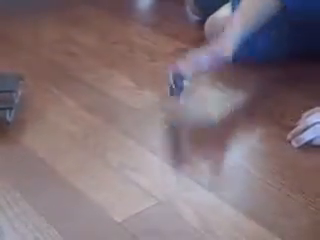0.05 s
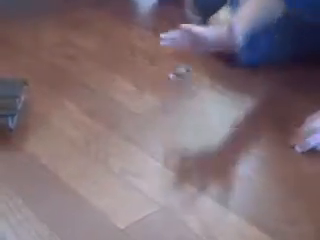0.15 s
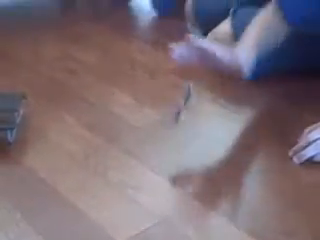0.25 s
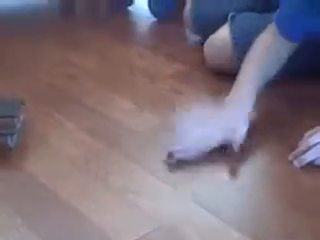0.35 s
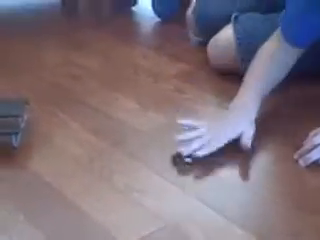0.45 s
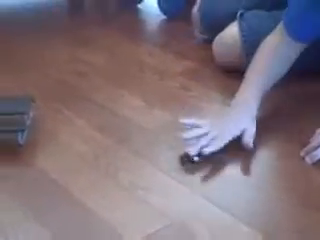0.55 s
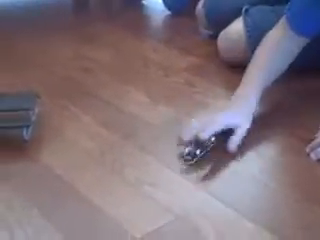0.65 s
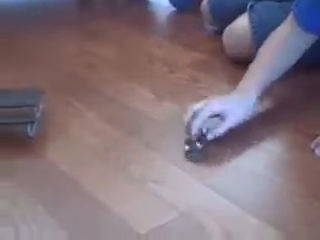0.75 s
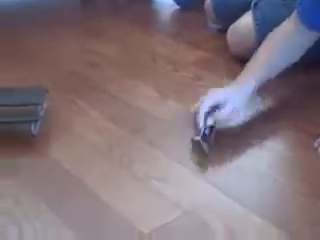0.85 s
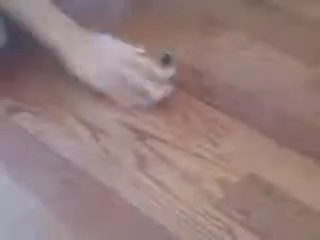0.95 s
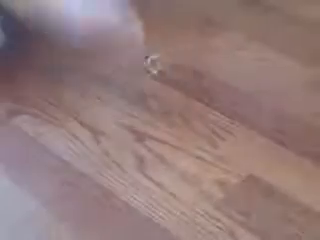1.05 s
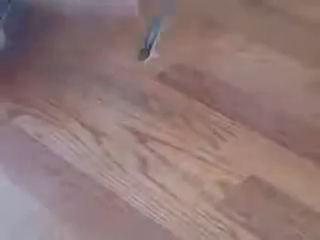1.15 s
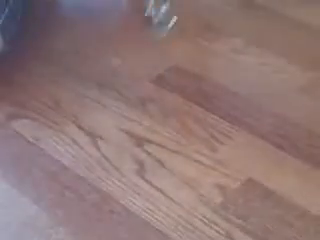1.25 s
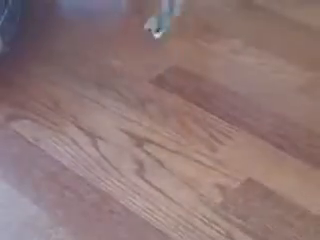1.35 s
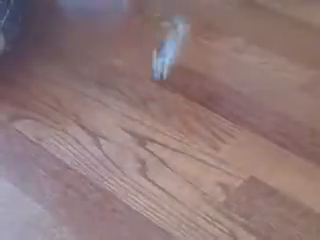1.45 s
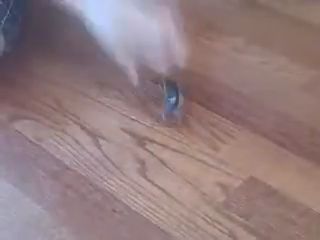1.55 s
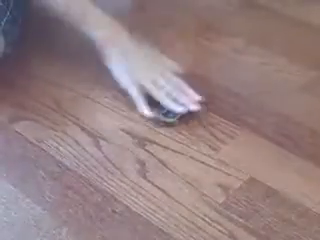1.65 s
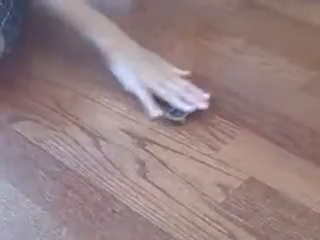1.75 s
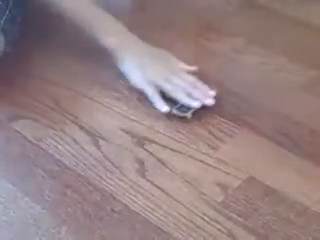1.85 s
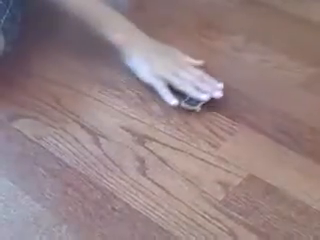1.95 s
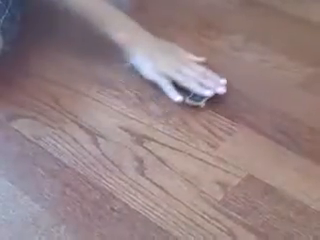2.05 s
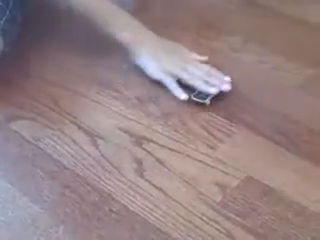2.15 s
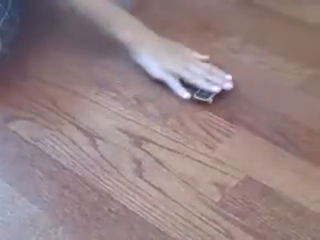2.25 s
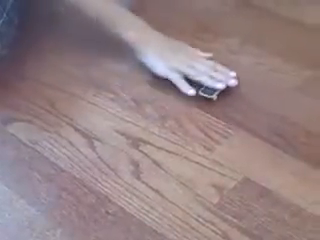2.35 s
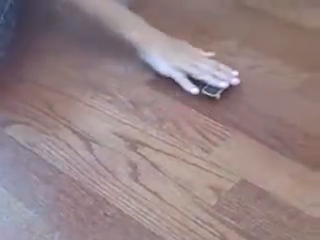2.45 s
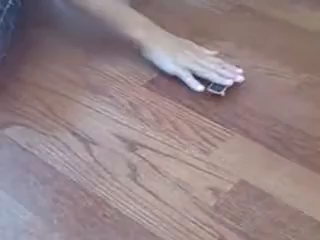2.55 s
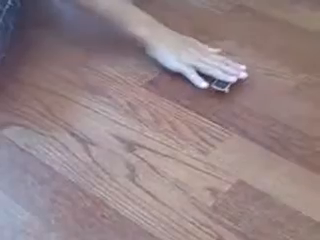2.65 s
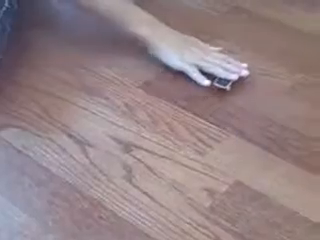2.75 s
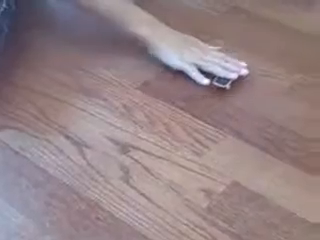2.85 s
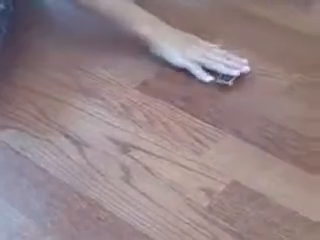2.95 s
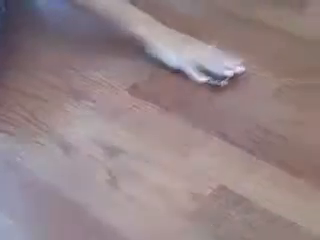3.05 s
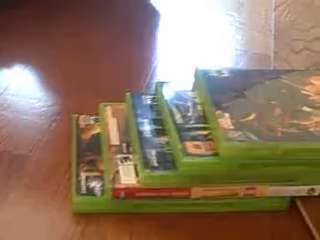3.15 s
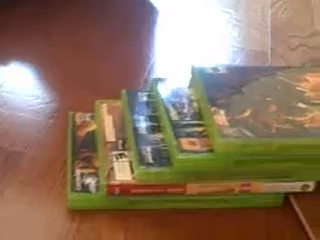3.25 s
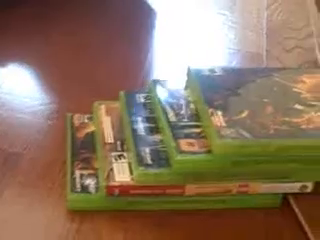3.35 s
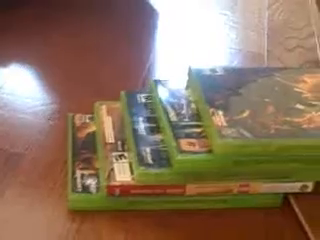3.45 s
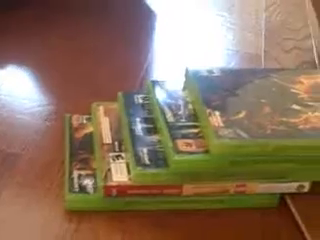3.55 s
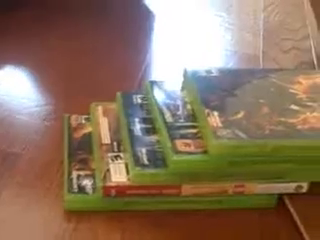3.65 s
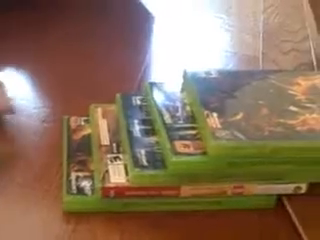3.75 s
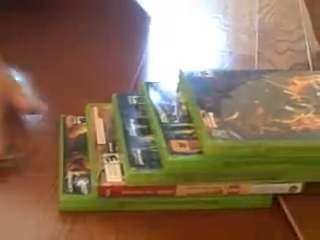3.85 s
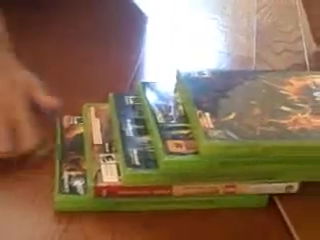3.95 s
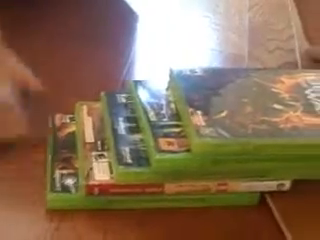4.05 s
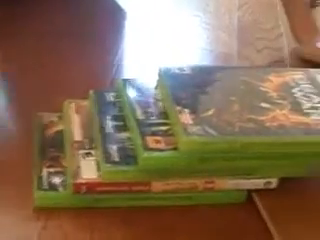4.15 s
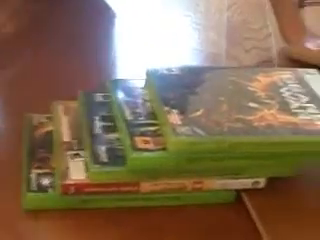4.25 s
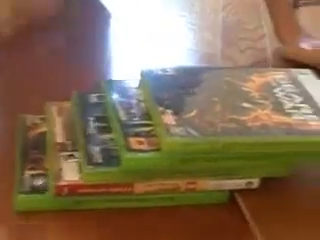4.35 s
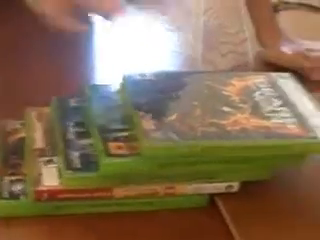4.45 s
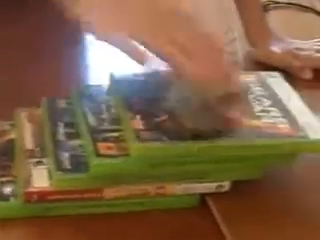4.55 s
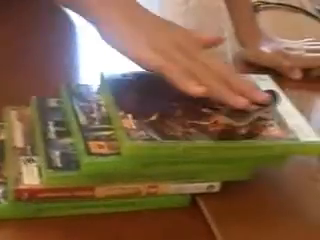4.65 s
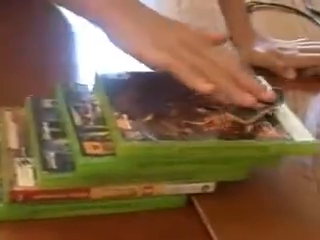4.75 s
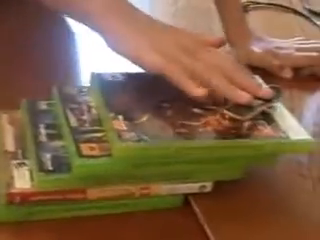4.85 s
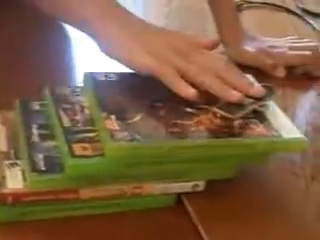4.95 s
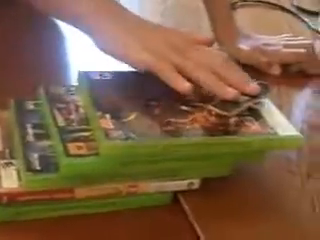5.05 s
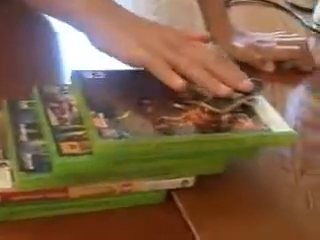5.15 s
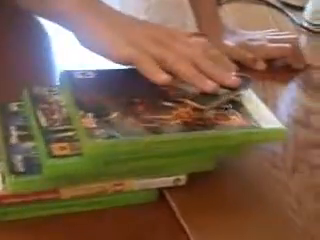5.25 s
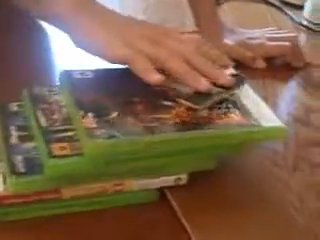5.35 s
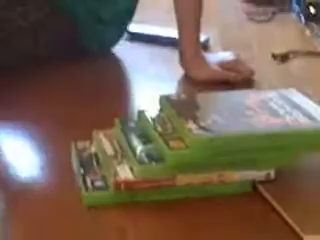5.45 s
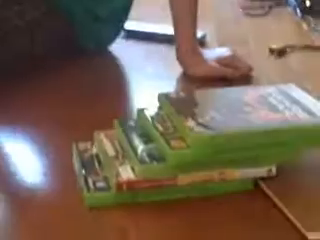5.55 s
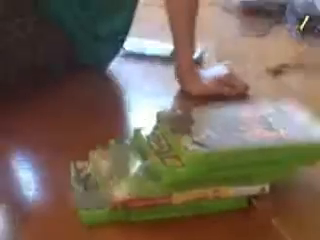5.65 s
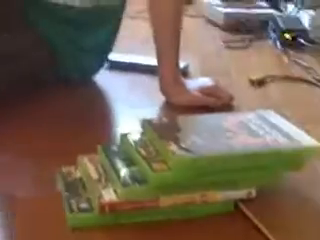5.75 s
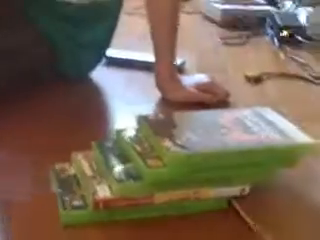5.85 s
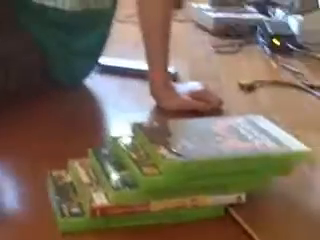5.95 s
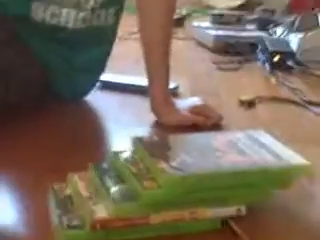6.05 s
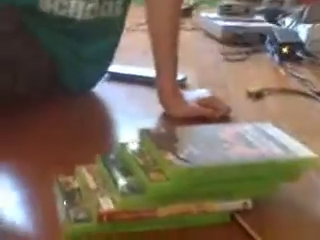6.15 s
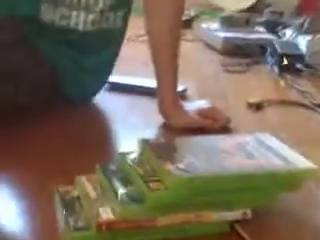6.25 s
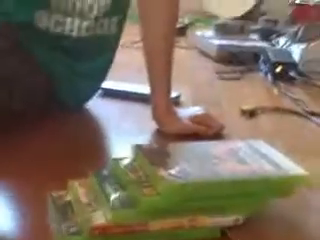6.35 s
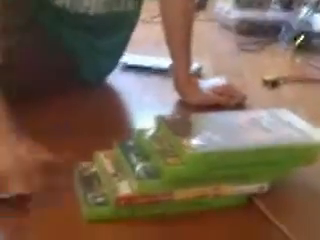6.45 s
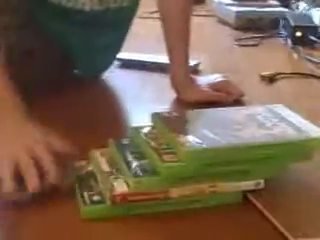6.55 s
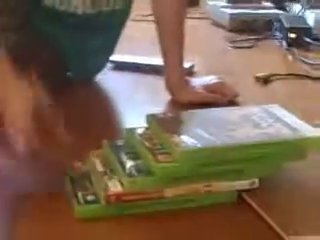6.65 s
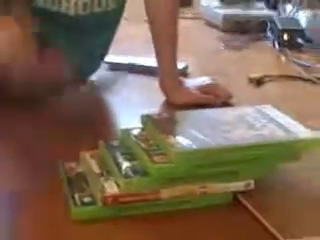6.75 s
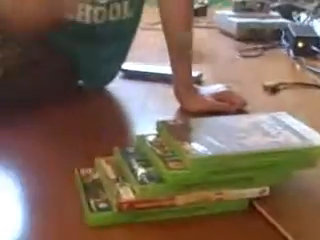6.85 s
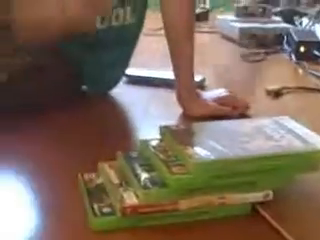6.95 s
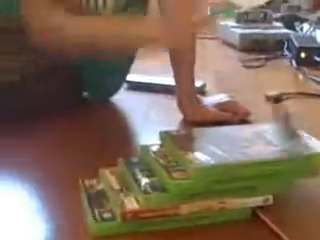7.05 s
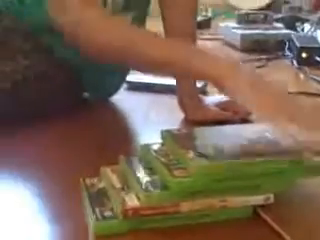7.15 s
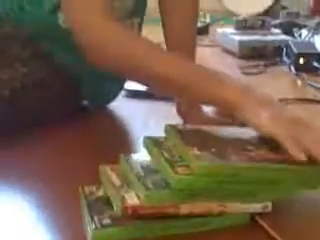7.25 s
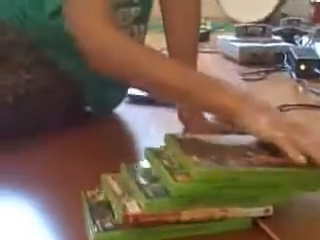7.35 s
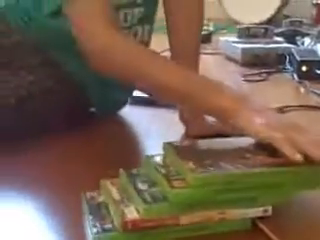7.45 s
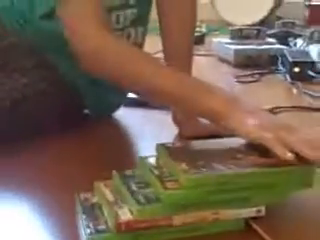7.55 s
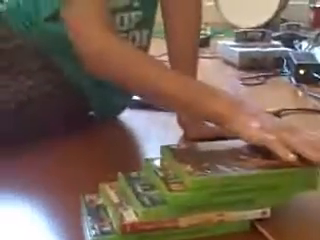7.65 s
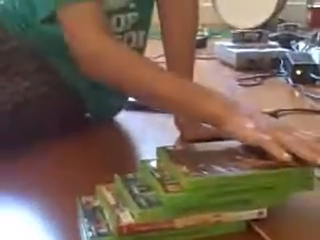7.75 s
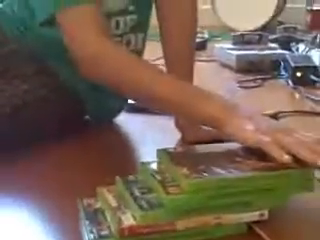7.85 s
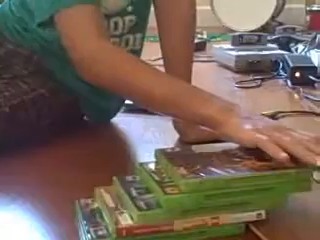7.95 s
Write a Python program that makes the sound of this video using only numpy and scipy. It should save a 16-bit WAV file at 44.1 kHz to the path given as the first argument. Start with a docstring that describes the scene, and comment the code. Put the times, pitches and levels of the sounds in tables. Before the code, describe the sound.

A tiny board snaps, lands and rattles on hardwood and stacked plastic cases, with brief rolls, silent gaps and a lively room echo.

```python
"""A toy skateboard on a hardwood floor and a stack of plastic cases in a bare room, in four shots.
First hard clacks, as the level sinks; from 1 s a fade-in, a knot of blows near 1.8 s and ticking wheels.
After a short silence a hum joins, wheels roll in and the deck clatters, until a second gap near 5.5 s.
Last, a faint roll, loud blows from 6.8 s and a clatter dying away. Cracks ring the deck, low modes give
the hollow thuds, filtered noise rolls; random decaying echo makes the room around the microphone."""
import sys
import numpy as np
from scipy import signal
from scipy.fft import rfft, irfft
from scipy.io import wavfile
from scipy.ndimage import uniform_filter1d

SR = 44100
rng = np.random.default_rng(int(sys.argv[2]) if len(sys.argv) > 2 else 0)


def materialize(psi):
    """Save the field psi as 16-bit PCM at rate SR to the path in sys.argv[1].

    A 1-D psi becomes a single channel; in a 2-D psi each row is a channel.
    """
    bounded = np.clip(np.atleast_2d(psi).T, -1, 1)
    quanta = np.round(bounded * 32767).astype(np.int16)
    wavfile.write(sys.argv[1], SR, quanta)


N = 353241

# wheels, tail and axles striking: (time [s], level [dB], centre of the crack [Hz],
# treble against the middle [dB], length of the crack [ms])
CLACKS = [(0.006, -50, 4270, 2.5, 3.2), (0.1681, -46.5, 3540, -17, 1.6), (0.2151, -20.5, 3380, -10, 1.7),
          (0.2196, -31.5, 3450, -2, 4.4), (0.488, -24.5, 2580, 1.5, 4.4), (0.4926, -28, 3580, 11, 1.6),
          (0.5374, -12, 5400, -12, 2.5), (0.5412, -11.5, 4800, -20.5, 4.6), (0.5444, -6.5, 4900, -32, 0.9),
          (1.0651, -35, 2150, -2.5, 1.1), (1.1517, -26, 3600, -12, 4.5), (1.121, -27.5, 3000, -9, 2.2),
          (1.2105, -13.5, 2400, -3, 1.55), (1.2175, -28, 2980, -6.5, 1.5), (1.7903, -16.5, 2860, 5.5, 2.2),
          (1.793, -16.5, 3400, -2, 1.8), (1.7963, -11.5, 3050, 0, 1.3), (1.8006, -14, 2630, -4, 1.6),
          (1.8065, -13.5, 2820, -7, 1.95), (1.8221, -22, 2640, -8.5, 1), (1.8827, -16, 2870, 4, 0.51),
          (1.8918, -5, 3600, -8, 1.08), (1.8958, -4.5, 2670, -8, 0.54), (1.899, -17, 1310, -5.5, 1.1),
          (1.9025, -21, 1320, -3, 1.3), (1.9318, -29, 2510, -8, 8.7), (3.8878, -36.5, 2500, 2, 2.8),
          (4.1843, -20, 2280, -11, 1.8), (4.186, -26, 975, -19.5, 2.25), (4.2446, -31.5, 2400, -10.5, 3.3),
          (4.2721, -30, 1260, -2.5, 1.2), (4.326, -15.5, 3100, 4.5, 0.91), (4.3291, -19.5, 2410, -2, 1.55),
          (4.3777, -35.5, 2580, 6, 1.6), (4.731, -13, 3570, -7, 1.6), (4.7323, -18, 2240, 1, 3.5),
          (4.7458, -18, 2980, -12, 1.2), (4.7475, -19.5, 2500, 6.5, 1.8), (4.7525, -20.5, 3000, 24, 0.32),
          (4.764, -24, 3040, -6, 4.4), (4.7654, -7, 1380, -24, 0.54), (4.7878, -21.5, 966, -7, 2.04),
          (5.618, -37.5, 786, -17.5, 1.6), (5.6297, -31.5, 2640, 8, 2.3), (5.7593, -50, 1920, 12, 4.5),
          (5.854, -31, 2700, -23, 2.9), (5.8556, -32, 980, 10.5, 1.9), (5.8609, -23, 1440, 9, 0.67),
          (6.1439, -49.5, 1440, -4.5, 2.2), (6.1903, -48, 860, -5, 3.4), (6.5857, -43, 1610, -10.5, 2.5),
          (6.8415, -25, 3100, -2, 5.9), (6.9036, -16, 3400, -6, 2.73), (6.906, -23, 1300, -13.5, 2.1),
          (7.2857, -28.5, 3500, -2.5, 2.5), (7.287, -29.5, 800, -20, 3.9), (7.3246, -26.5, 1030, 8, 3.3),
          (7.326, -16.5, 3400, -8, 2.8), (7.3275, -22.5, 1000, -11, 5.6), (7.3446, -29, 830, -10, 5.8),
          (7.3645, -29, 900, -9, 3.4), (7.3797, -23, 4530, -3, 1.45), (7.3854, -45, 1020, 8, 1.9),
          (7.8999, -49.5, 1600, -30.5, 1.7)]
# wheels ticking over grit and board joints: (time [s], level [dB])
TICKS = [(0.9, -54), (0.9404, -40.5), (1.0089, -42), (2.5853, -56), (2.829, -61), (2.971, -69.5),
         (3.0213, -60), (3.056, -69.5), (3.2527, -47.5), (3.516, -56), (3.573, -59), (3.5852, -53),
         (3.627, -45), (3.644, -48), (3.6716, -42), (3.6971, -40.5), (3.7547, -40), (3.7702, -55),
         (3.8031, -53), (3.9747, -41.5), (4.0194, -40.5), (4.0393, -42), (4.0915, -48), (4.1246, -55.5),
         (4.138, -38.5), (4.291, -37), (6.6326, -51.5), (6.6856, -37)]
# modes the little deck rings with: (frequency [Hz], relative level [dB], t60 [s])
DECK_MODES = [(900, -2, 0.02), (1213, 1.5, 0.015), (1826, -3.5, 0.034), (2230, -6.5, 0.024),
              (3060, -4.5, 0.021), (3600, -6, .025), (4880, -11, 0.038), (8800, -7.5, .02)]
# floor boards or hollow cases answering a blow: (time [s], level [dB], settled pitch [Hz], t60 [s])
THUDS = [(0.2145, -35.5, 252.6, 0.092), (0.488, -27.5, 241, 0.056), (0.541, -26, 208, 0.03),
         (1.211, -30.5, 168.3, 0.12), (1.791, -25.5, 167, 0.14), (1.892, -23, 106.4, 0.13),
         (1.902, -31, 171, 0.15), (4.1846, -31, 264, 0.081), (4.3263, -28, 164, 0.1),
         (4.338, -26.5, 179, 0.037), (4.345, -33, 101, 0.14), (4.7326, -14.5, 146, 0.041),
         (4.7657, -17, 165, 0.03), (5.469, -47.5, 89.2, 0.072), (5.63, -40, 193, 0.083),
         (5.856, -29, 148, 0.041), (6.19, -41, 587, 0.053), (6.586, -36.5, 352, 0.036),
         (6.8418, -17, 203, 0.028), (6.904, -20, 167, 0.022), (7.286, -22.5, 170, 0.025),
         (7.325, -15.5, 300, 0.031), (7.861, -43, 134, 0.11), (7.9, -59.5, 508, 0.08)]
# rolling wheels, and the clatter and sliding after landings, one curve each: (time [s], rumble level [dB])
ROLLS = [
    [(0.12, -81), (0.21, -53)],
    [(1.02, -62.5), (1.1, -39.5), (1.2, -34), (1.3, -54.5)],
    [(1.9, -52), (2.1, -56.5), (2.45, -75)],
    [(2.2, -58), (2.5, -56), (3.16, -59.5)],
    [(3.56, -73), (3.6, -51), (3.8, -44), (4.15, -45), (4.21, -39)],
    [(4.2, -55.5), (4.32, -35.5)],
    [(4.78, -37.5), (4.89, -63.5), (5.0, -55)],
    [(5.64, -79), (5.77, -54.5), (5.85, -71)],
    [(5.88, -57), (6.03, -59), (6.13, -59), (6.35, -54.5), (6.5, -57), (6.735, -42), (6.82, -52),
     (6.86, -39)],
    [(7.335, -35), (7.39, -38), (7.48, -51.5), (7.7, -66.5), (7.9, -95.5), (8.0, -93)],
]
# sound of each of these curves: (rumble centre [Hz], rumble width [Hz], rattle centre [Hz], then against
# the rumble: axle rattle [dB], scrape hiss [dB], floor boom [dB]; last, depth of the grit [dB])
SURFACES = [(670, 600, 8700, -6.5, -0.5, -7.5, -4), (900, 1200, 2750, 0, -11, -15, -6.5),
            (1190, 600, 3300, 7.5, -1, -10.5, -9.5), (444, 340, 2000, -14.5, -27, -11.5, 0),
            (600, 710, 1660, -6, -13.5, -9.5, -1), (800, 800, 2500, -4, -8, -2, 15.5),
            (520.5, 2100, 2500, -13, -30.5, -13, 17), (580, 1500, 4800, -9, -14, 0, -14),
            (560, 1040, 2270, 1, -8, -6.5, -16.5), (785, 1700, 2700, 2.5, -1.5, -8.5, -14)]
# floor boards humming under the wheels: (frequency [Hz], width [Hz], relative level [dB])
BOARDS = [(415, 38, 2.5), (506, 55, 2), (600, 50, 0.5), (721, 60, -7.5), (900, 130, -0.5), (1180, 44, -3)]
# rings of the loose axles: (frequency [Hz], width [Hz], relative level [dB])
AXLE_RINGS = [(1550, 600, -6), (4600, 1200, -12)]
# decay of the room's main echo: (frequency [Hz], t60 [s])
ROOM_DECAY = [(100, .6), (260, 0.56), (700, 0.67), (1840, 0.61), (3500, 0.59), (6000, 0.5), (11000, 0.36),
              (14500, 0.28), (16000, 0.4)]
# colour the walls give the echo: (frequency [Hz], relative level [dB])
WALL_COLOUR = [(100, 6.5), (400, 15), (1200, 10), (2000, 2), (4200, -1), (5200, -2), (9500, -3), (15000, 0)]
# send into the echo, grows with distance; each source has its own share too: (time [s], level [dB])
ECHO_SEND = [(0, -7.5), (1, -6), (1.5, 1), (1.85, -4.5), (2, -4.5), (4.2, -7), (4.75, -9), (5.8, -8.5),
             (6.9, -10), (7.3, -12)]
# the shots, the last cut at N: (start [s], end [s])
SHOTS = [(0, 1.0), (1.0, 3.162), (3.25, 5.506), (5.561, 8.02)]
# background and fades of each shot: (room air [dB], handling rumble, before its swell [dB],
# hum pitch [Hz], hum [dB], fade-in [s], fade-out [s])
BEDS = [(-63.5, -65, 80, -100, 0.00067, 0.9), (-63.5, -72, 80, -100, 0.5, 0.002),
        (-64.5, -70, 79.4, -58, 0.11, 0.0013), (-62, -68, 91, -57.5, 0.31, 0.002)]
# spectrum of the room air: (frequency [Hz], relative level [dB])
AIR_COLOUR = [(12, -34.5), (20, -14), (83, -10.5), (130, -7.5), (241, -18), (410, -20), (642, -25),
              (1260, -24.5), (9400, -42.5), (16000, -44)]
# the one stretch of full silence: (start [s], end [s])
HUSH = (3.193, 3.243)

TICK_HZ, TICK_TREBLE_DB, TICK_MS = 3500, 3, 1.4
RING_DB = -6  # ring of the deck against the crack
BRIGHTEN = 0.27  # rattle and hiss drop this many extra dB for each dB the curve eases off
FADED = 0.21  # amplitude at the quiet end of a fade
FAINT_DB = -83  # very faint steady noise under everything but the hush
EDGE_HZ = 16100  # upper band limit


def gain_of(db):
    """Decibels to amplitude."""
    return 10 ** (np.asarray(db) / 20)


def evened(x):
    """Scales to rms 1."""
    return x / np.sqrt(np.mean(x ** 2) + 1e-20)


def read(points, hz):
    """Reads a spectrum table on a log-frequency axis."""
    f, value = np.transpose(points)
    return np.interp(np.log(hz + 1), np.log(f + 1), value)


def columns(rows, t):
    """Reads the columns of a curve at the times t."""
    s, *rest = np.transpose(rows)
    return [np.interp(t, s, c) for c in rest]


def add(mix, s, sound):
    """Mixes a sound in at time s."""
    part = mix[max(round(s * SR), 0):][:len(sound)]
    part += sound[:len(part)]


def resonate(x, hz, width):
    """A resonance of gain 1: shifts hz down to zero, smooths, and shifts back."""
    turn = np.exp(2j * np.pi * np.cumsum(hz * np.ones(len(x))) / SR)
    r = np.exp(-np.pi * width / SR)
    smooth = signal.lfilter([1 - r], [1, -r], x / turn + 1e-18)
    return 2 * (turn * smooth).real


def passed(x, hz, kind):
    """Second-order high- or low-pass."""
    return signal.sosfilt(signal.butter(2, hz, kind, fs=SR, output="sos"), x)


def crack_colour(middle_source, treble_source, hz, treble_db):
    """A hard blow excites a broad band around hz and a hissy band on top."""
    middle = resonate(resonate(middle_source, hz, .8 * hz), hz, 1.4 * hz)
    middle = passed(passed(middle, .6 * hz, "high"), .45 * hz, "high")
    treble = passed(passed(treble_source, 5000, "high"), 12300, "low")
    return evened(middle) + gain_of(treble_db) * evened(treble)


def deck_ring(t, hz, share):
    """A blow sets the deck's modes decaying; the share of each mode is drawn at random for each blow."""
    ring = np.zeros(len(t))
    for (f, mode_db, t60), g, detune in zip(DECK_MODES, *share):
        # modes near the crack's centre are favoured
        db = mode_db + 3.0 * g - 60 * t / t60 - 9.0 * abs(np.log2(f / hz))
        ring += gain_of(db) * np.sin(2 * np.pi * f * (1 + detune / 50) * t)
    return gain_of(RING_DB) * ring


def clacks():
    """Each blow or tick is a short noise crack that sets the deck ringing.
    Returns the direct sound and, as three rows taken in turn, the bare pulse that fills the room."""
    out, sent, t = np.zeros(N), np.zeros((3, N)), np.arange(4096) / SR
    blows = CLACKS + [(s, db, TICK_HZ, TICK_TREBLE_DB, TICK_MS) for s, db in TICKS]
    noise = rng.standard_normal((len(blows), 2, len(t)))
    share = rng.standard_normal((len(blows), 2, len(DECK_MODES)))
    for k, (s, db, hz, treble_db, long_ms) in enumerate(blows):
        # contact chatters, then lets go
        shape = np.exp(-(1000 * t / long_ms) ** 2) * (1 - np.exp(-t / 0.00054))
        crack = shape * crack_colour(*noise[k], hz, treble_db)
        ring = deck_ring(t, hz, share[k])
        add(out, s, gain_of(db) * (crack + ring))
        # a single click, scaled to the energy of the crack
        pulse = crack_colour(t == 0, t == 0, hz, treble_db) * np.sqrt(np.mean(shape ** 2))
        add(sent[k % 3], s, gain_of(db + 3.5) * (pulse + ring / 6))
    return out, sent


def thuds():
    """A low mode whose pitch sags after the blow, with a shorter-lived overtone."""
    out, t = np.zeros(N), np.arange(8192) / SR
    for s, db, hz, t60 in THUDS:
        turn = 2 * np.pi * np.cumsum(hz * (1 + 0.51 * np.exp(-t / 0.0011))) / SR
        tone = np.sin(turn) * gain_of(-60 * t / t60)
        overtone = 0.58 * np.sin(2.3 * turn) * gain_of(-130 * t / t60)
        onset = 1 - np.exp(-t / 0.00028)
        add(out, s, -gain_of(db) * (tone + overtone) * onset)
    return passed(passed(out, 82, "high"), 82, "high")


def roll_or_clatter(rows, hz, width_hz, rattle_hz, rattle_db, hiss_db, boom_db, grit_db):
    """Uneven grain and sparse grit drive the boards, a loose rattle and a scrape hiss.
    Returns the start time and the sound."""
    t = np.arange(rows[0][0], rows[-1][0], 1 / SR)
    db = columns(rows, t)[0]
    dull_db = BRIGHTEN * (db - db.max())
    rumble_noise, axle_noise, hiss_noise, boom_noise, lumps = rng.standard_normal((len(t), 5)).T
    # about 220 grains a second, each dying within a few tens of ms
    grit = (rng.random(len(t)) < 220 / SR) * rng.exponential(1, len(t))
    grit = signal.lfilter([1], [1, -np.exp(-1 / SR / 0.005)], grit)
    grain = gain_of(1.2 * evened(uniform_filter1d(lumps, 300)))
    bumpy = grain * (1 + gain_of(grit_db) * grit)

    rumble = evened(resonate(resonate(rumble_noise * bumpy ** .4, hz, width_hz), hz, 2 * width_hz))
    boards = sum(gain_of(g) * resonate(rumble, f, w) for f, w, g in BOARDS)
    rumble = evened(rumble + gain_of(-1.5) * boards)
    boom = evened(resonate(resonate(boom_noise, 99, 120), 220, 280))

    shaken = axle_noise * bumpy
    axle = resonate(resonate(shaken, rattle_hz, 800), rattle_hz, 1600)
    rings = sum(gain_of(g) * resonate(resonate(shaken, f, w), f, 4.5 * w) for f, w, g in AXLE_RINGS)
    rattle = evened(axle - rings)

    hiss = passed(passed(hiss_noise * bumpy ** 1.2, 4700, "high"), 11000, "low")
    hiss = evened(hiss + 0.12 * resonate(hiss, 7900, 2000))  # the small wheels sing near the top

    bright = gain_of(rattle_db) * rattle + gain_of(hiss_db) * hiss
    sound = rumble + gain_of(dull_db) * bright + gain_of(boom_db) * boom
    fade = np.clip(np.minimum(t - t[0], t[-1] - t) / 0.038, 0, 1)
    return rows[0][0], gain_of(db) * sound * fade


def room_tail():
    """Dense random echo of the bare room, each band dying at its own speed."""
    t = np.arange(SR) / SR
    taps = rng.standard_normal(SR) * (1 - np.exp(-t / 0.0017))
    hz, frame_t, z = signal.stft(taps, SR, nperseg=256)
    fall_db = -60 * frame_t / read(ROOM_DECAY, hz)[:, None]
    # a weak, slower tail returns from the rooms next door
    decay = np.hypot(gain_of(fall_db), gain_of(-14.5 + 0.45 * fall_db))
    z = z * gain_of(read(WALL_COLOUR, hz)[:, None]) * decay
    tail = signal.istft(z, SR, nperseg=256)[1]
    return tail / np.linalg.norm(tail)


def background(count, air_db, rumble_db, hum_hz, hum_db):
    """Coloured noise for room air, swelling low noise for handling, a steady sine hum; count samples."""
    air_noise, rumble_noise, wander = rng.standard_normal((3, count))
    colour = gain_of(read(AIR_COLOUR, np.fft.rfftfreq(count, 1 / SR)))
    air = evened(irfft(rfft(air_noise) * colour, count))
    swell = gain_of(evened(passed(wander, 3.7, "low")))  # about 1 dB up and down
    rumble = evened(passed(passed(rumble_noise, 45, "low"), 22, "high")) * swell
    hum = np.sqrt(2) * np.sin(2 * np.pi * hum_hz * np.arange(count) / SR)
    return gain_of(air_db) * air + gain_of(rumble_db) * rumble + gain_of(hum_db) * hum


def scene():
    """Echo stops with its shot; blows take three random echoes in turn, so that close hits do not comb."""
    t = np.arange(N) / SR
    cracks, sent = clacks()
    low = thuds()
    rolling = np.zeros(N)
    for rows, surface in zip(ROLLS, SURFACES):
        add(rolling, *roll_or_clatter(rows, *surface))
    sent[0] += 0.043 * rolling + 0.5 * low
    sent *= gain_of(columns(ECHO_SEND, t)[0])
    direct = cracks + low + rolling
    tails = np.array([room_tail() for _ in sent])
    out = np.zeros(N)
    for (start, end), (*bed, in_s, out_s) in zip(SHOTS, BEDS):
        a, b = round(start * SR), min(round(end * SR), N)
        echo = signal.fftconvolve(sent[:, a:b], tails, axes=1)[:, :b - a].sum(0)
        fade = np.interp(t[a:b], [start, start + in_s, end - out_s, end], [FADED, 1, 1, FADED])
        edges = signal.windows.tukey(b - a, 200 / (b - a))  # 100 samples of taper at each end
        out[a:b] = (direct[a:b] + echo + background(b - a, *bed)) * fade * edges
    heard = (t < HUSH[0]) | (t > HUSH[1])
    faint_noise = background(N, FAINT_DB, FAINT_DB, 0, FAINT_DB)  # at 0 Hz the hum is silent
    return (out + faint_noise * heard)[None]


def record(dry):
    """The microphone's input stage rounds off the hardest peaks; then the band limit."""
    rounded = .75 * np.tanh(dry / .75)
    low_pass = signal.firwin(511, EDGE_HZ, window=("kaiser", 9), fs=SR)
    return signal.oaconvolve(rounded, low_pass[None], "same")


dry = scene()
out = record(dry)
materialize(out)
```